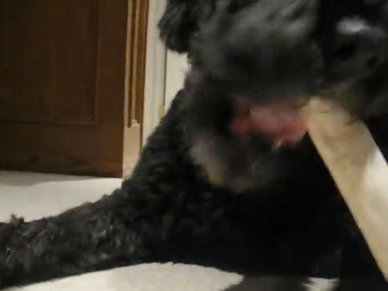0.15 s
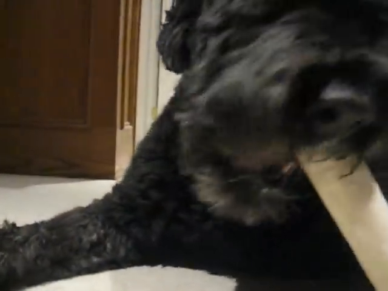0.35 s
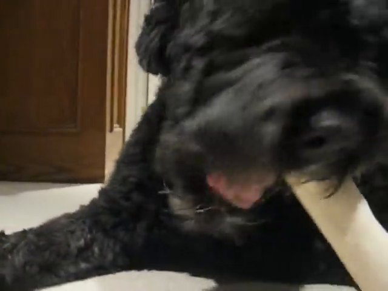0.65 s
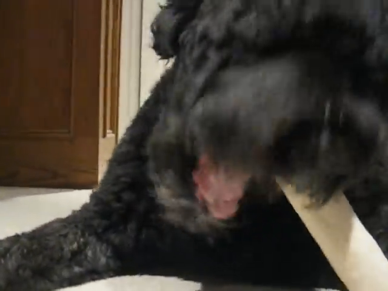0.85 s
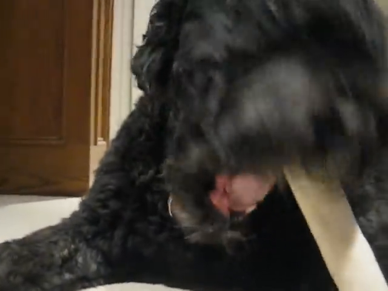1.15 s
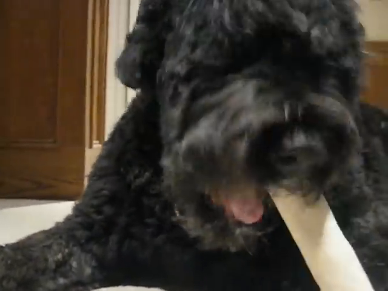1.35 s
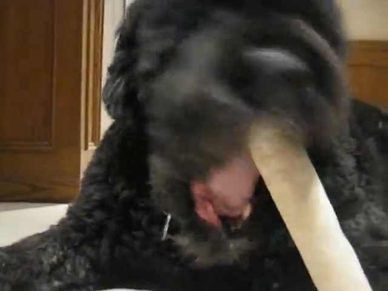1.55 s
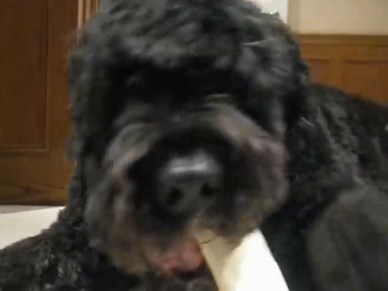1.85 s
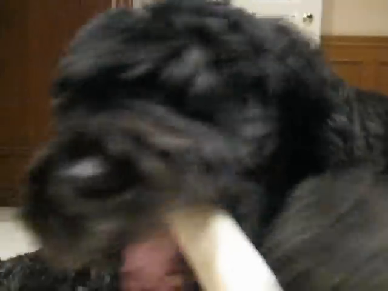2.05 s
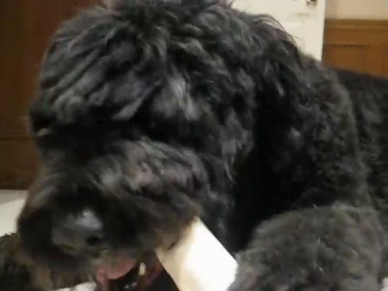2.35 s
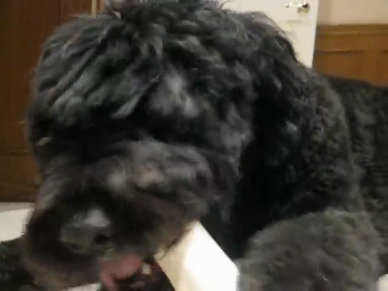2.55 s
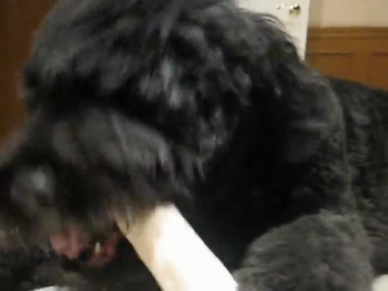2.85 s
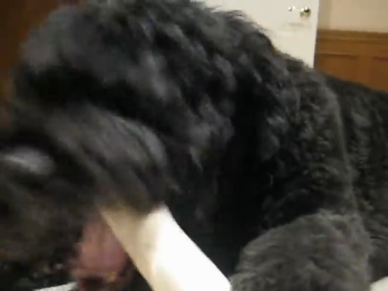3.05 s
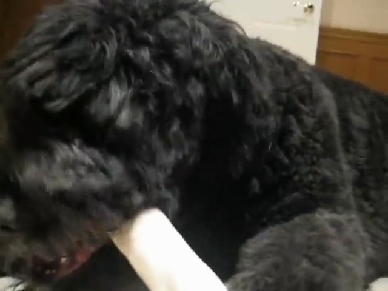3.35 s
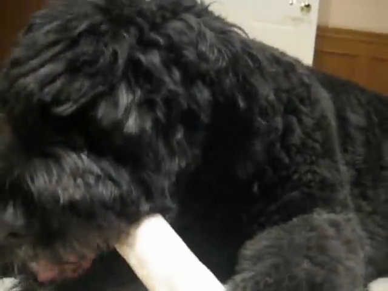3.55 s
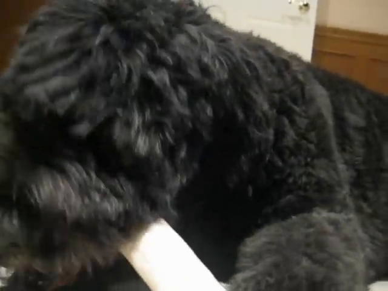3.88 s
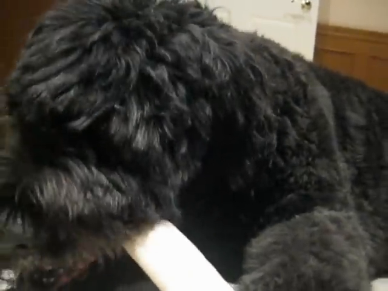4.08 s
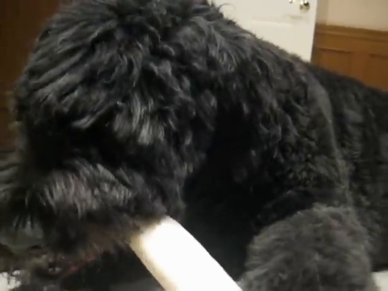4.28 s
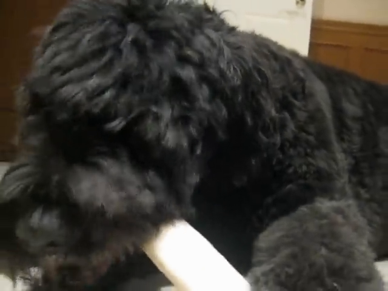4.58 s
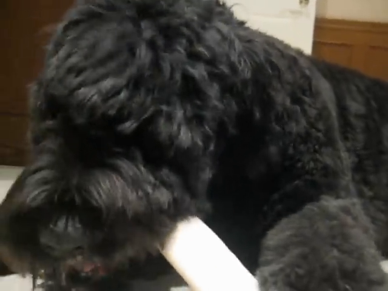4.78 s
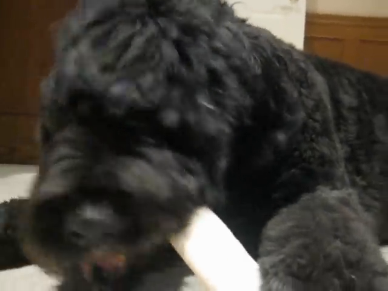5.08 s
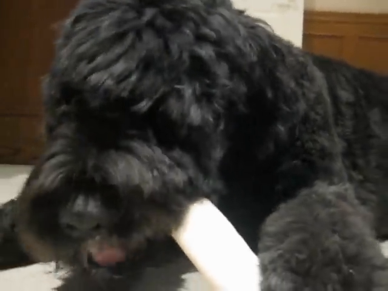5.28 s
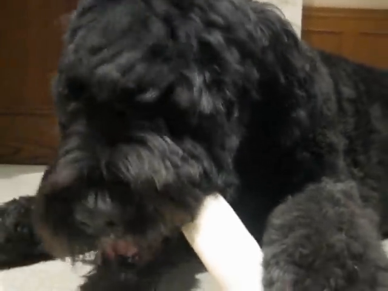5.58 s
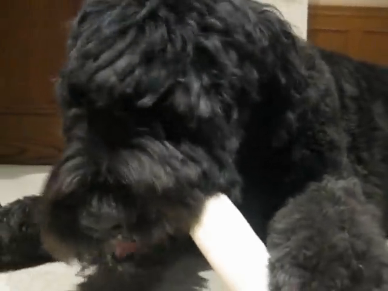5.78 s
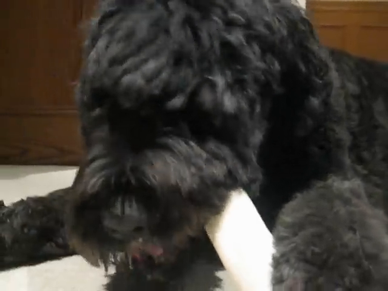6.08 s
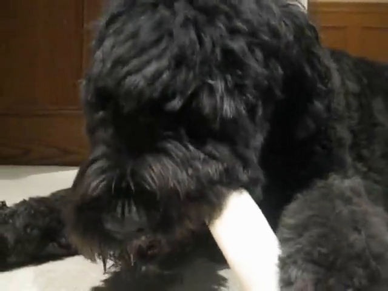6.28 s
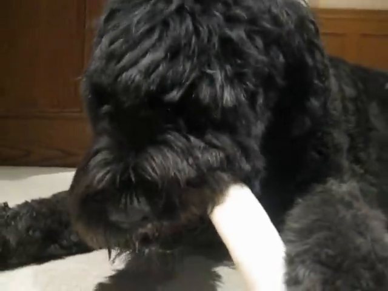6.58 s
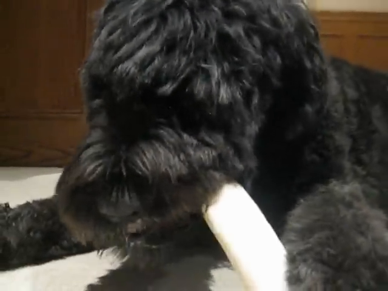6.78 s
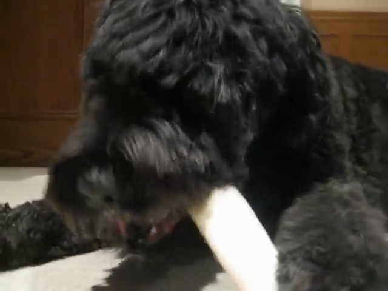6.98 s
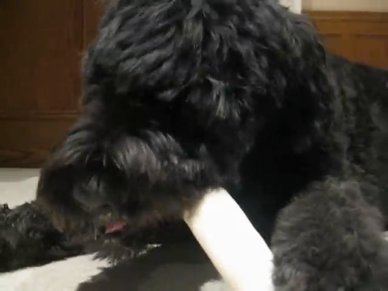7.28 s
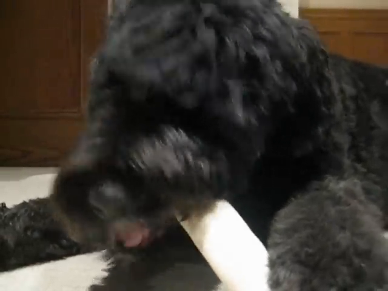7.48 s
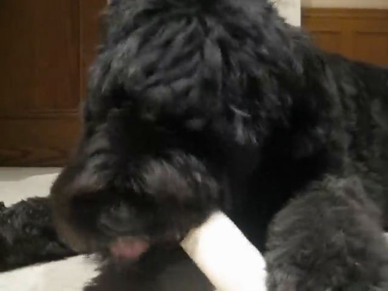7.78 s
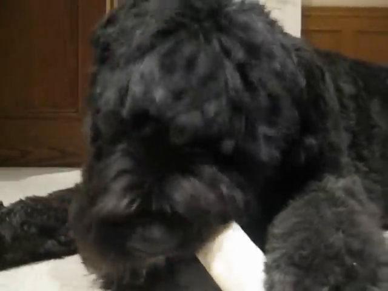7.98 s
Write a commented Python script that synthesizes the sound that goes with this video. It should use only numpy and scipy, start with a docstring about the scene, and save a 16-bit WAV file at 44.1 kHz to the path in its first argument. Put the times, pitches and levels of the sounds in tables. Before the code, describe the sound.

Teeth rub and scrape along a bone as a dog chews right beside the microphone indoors. An early sharp snap is followed by a run of loud crunches, then uneven knocking bites with small wet clicks of tongue and saliva. Underneath are soft thumps of the bone, a low rustle of the dog on carpet, and a faint appliance hum with hiss.

```python
"""A bone scrapes wetly along teeth and fur as a big dog gnaws it, close by in a carpeted room.
Friction makes the rubbing and the crunches, and parting films of saliva tick and smack. Each bite is
an impact that rings tooth, mouth and jaw; once a sliding tooth squeaks. The dog's weight rumbles on
the carpet and the bone bumps dully, over a faint appliance hum and hiss. One narrow-band microphone
hears it all, and the hardest snaps overload it, so that the level dips briefly."""
import sys
import numpy as np
from scipy import signal
from scipy.fft import rfft, irfft, next_fast_len
from scipy.io import wavfile
from scipy.ndimage import uniform_filter1d, map_coordinates

SR = 44100
rng = np.random.default_rng(int(sys.argv[2]) if len(sys.argv) > 2 else 0)


def store_pcm(level_fs):
    """Save levels as 16-bit WAV."""
    pcm = np.round(np.clip(level_fs, -1, 1) * 32767).astype(np.int16)
    wavfile.write(sys.argv[1], SR, np.atleast_2d(pcm).T)


N = 358974
TIME_S = np.arange(N) / SR
CLICK_S = np.arange(2048) / SR  # time within one click
CLICK_MIDDLE_S = CLICK_S[-1] / 2
REST_RUB_DB, REST_SIZZLE_DB = -54.5, -49  # the mouth never quite stops moving
# spectrum of a tiny crack: frequency_hz, gain_db
CRACK_SPECTRUM = [(100, -5), (700, -4.5), (1500, -0.5), (3300, -8), (4800, -4.5), (5800, -18.5),
                  (7000, -27.5)]
# spectrum of a soft, heavy contact: frequency_hz, gain_db
THUMP_SPECTRUM = [(15, -31), (30, -2), (70, -3), (260, -3), (340, -8), (480, -13), (780, -14), (1300, -42)]


def amp(db):
    """Decibels as an amplitude ratio."""
    return 10 ** (np.asarray(db) / 20)


def unit(x):
    """Power normalisation: scaled to rms 1."""
    return x / np.sqrt(np.mean(x ** 2) + 1e-20)


def burst(x):
    """Energy normalisation: scaled to the energy of 5 ms at rms 1."""
    return x * np.sqrt(.005 * SR / (np.sum(x ** 2) + 1e-20))


def wobble(rate_hz):
    """Random modulation: a smooth curve through rate_hz random knots a second."""
    knots = rng.standard_normal(int(N * rate_hz / SR) + 4)
    return map_coordinates(knots, [TIME_S * rate_hz])


def coloured(x, spectrum):
    """Zero-phase filtering by (frequency_hz, gain_db) points joined on a log frequency axis."""
    size = next_fast_len(len(x) + 8192)
    hz, db = np.transpose(spectrum)
    log_hz = np.log(np.fft.rfftfreq(size, 1 / SR) + 1)
    gain = amp(np.interp(log_hz, np.log(hz), db))
    return irfft(rfft(x, size) * gain, size)[:len(x)]


def noise(samples, spectrum):
    """White noise filtered to a spectrum."""
    return coloured(rng.standard_normal(samples), spectrum)


def add(track, start_s, sound):
    """Superposition: sums a sound into the track."""
    part = track[max(round(start_s * SR), 0):][:len(sound)]
    part += sound[:len(part)]


def ring(hz, cycles):
    """A heavily damped resonance whose envelope peaks after the given number of cycles."""
    age = CLICK_S * hz / cycles
    return age * np.exp(-age) * np.sin(2 * np.pi * hz * CLICK_S)


def crackle(rate_hz, scatter_db, share):
    """Friction as shot noise: random slips carry a share of the power, even hiss the rest."""
    slips = (rng.random(N) < rate_hz / SR) * rng.choice([-1, 1], N)
    sizes = amp(scatter_db * np.minimum(rng.standard_normal(N), 2))
    return np.sqrt(share) * unit(slips * sizes) + np.sqrt(1 - share) * rng.standard_normal(N)


def strokes():
    """Amplitude envelopes of dry rub and wet sizzle: each stroke takes hold, stays and lets go."""
    # teeth and tongue along the bone: start_s, length_s, rub_db, sizzle_db
    slides = [(0, 0.22, -35.5, -31), (0.138, 0.16, -33.5, -37), (0.32, 0.21, -48.5, -43),
              (0.64, 0.047, -36, -37), (0.713, 0.18, -41.5, -38.5), (1.117, 0.025, -52, -42),
              (1.277, 0.01, -38, -39), (1.331, 0.056, -36, -44), (1.574, 0.078, -42, -40.5),
              (1.657, 0.04, -30.5, -34), (1.818, 0.056, -37.5, -38), (2.005, 0.18, -40, -35.5),
              (2.216, 0.17, -44, -33.5), (2.436, 0.12, -46, -32), (2.49, 0.15, -75, -36),
              (2.836, 0.053, -47.5, -41.5), (3.08, 0.081, -47.5, -43), (3.195, 0.15, -48, -45),
              (3.454, 0.019, -42.5, -36.5), (3.789, 0.023, -45, -42), (3.888, 0.1, -60, -44),
              (4.206, 0.025, -39.5, -42.5), (4.346, 0.0047, -39, -35), (4.411, 0.013, -46, -37),
              (4.792, 0.02, -40, -43), (5.066, 0.13, -43, -42.5), (5.15, 0.057, -37.5, -49),
              (5.414, 0.1, -45, -46), (5.599, 0.0091, -33, -34), (5.707, 0.052, -40.5, -40.5),
              (5.89, 0.14, -42.5, -41), (6.09, 0.065, -38.5, -37.5), (6.214, 0.084, -42, -37),
              (6.578, 0.1, -50, -45.5), (6.711, 0.065, -46.5, -35), (7.539, 0.06, -45.5, -44.5),
              (8.034, 0.066, -41, -43)]
    attack_s, release_s = 0.015, 0.025
    gains = np.zeros((2, N))
    for start_s, length_s, rub_db, sizzle_db in slides:
        span_s = [start_s - 10 * attack_s, start_s + length_s + 10 * release_s]
        near = slice(*np.searchsorted(TIME_S, span_s))
        since_s = TIME_S[near] - start_s
        rise = np.exp(-(np.minimum(since_s, 0) / attack_s) ** 2)
        fall = np.exp(-np.maximum(since_s - length_s, 0) / release_s)
        # a new stroke takes over from the one that is fading
        gains[:, near] = np.maximum(gains[:, near], rise * fall * amp([[rub_db], [sizzle_db]]))
    return gains


def drifting(x, depth_db):
    """Time-varying filtering: broad resonances come and go as lips and tongue change shape."""
    frames = signal.stft(x, nperseg=512)[2]
    patches = uniform_filter1d(rng.standard_normal(frames.shape), size=5, axis=0)
    patches = uniform_filter1d(patches, size=6, axis=1)
    return unit(signal.istft(frames * amp(depth_db * unit(patches)), nperseg=512)[1][:N])


def scraping(rub_gain, sizzle_gain):
    """Sliding friction: the bone rubs in uneven catches; saliva adds a finer sizzle and ticks."""
    # dry and wet friction spectra: frequency_hz, gain_db
    rub_spectrum = [(250, -11.5), (500, -5), (800, -5), (1800, -2.5), (2500, -13), (3500, -25.5)]
    sizzle_spectrum = [(1400, -28), (2300, -11.5), (3200, -6), (3900, -6.5), (4800, -7.5), (5600, -17.5),
                       (6400, -22), (7200, -33.5)]
    restless = amp(0.39 * wobble(6.7))
    rub_gain = np.hypot(rub_gain, amp(REST_RUB_DB) * restless)
    sizzle_gain = np.hypot(sizzle_gain, amp(REST_SIZZLE_DB) * restless)
    catch = wobble(70)
    rub = coloured(crackle(rate_hz=650, scatter_db=5.5, share=0.43), rub_spectrum)
    rub = drifting(rub, depth_db=1.5) * amp(2.1 * catch)
    sizzle = coloured(crackle(rate_hz=360, scatter_db=8.0, share=0.47), sizzle_spectrum)
    sizzle = drifting(sizzle, depth_db=2.5)
    sparse_slips = crackle(rate_hz=19, scatter_db=4.5, share=0.84)
    crack = burst(noise(len(CLICK_S), CRACK_SPECTRUM) * amp(-60 * CLICK_S / 0.0011))
    ticks = amp(-13.5) * unit(signal.fftconvolve(sparse_slips, crack)[:N])
    flicker = amp(0.94 * catch + 0.65 * wobble(170))
    return rub_gain * rub + sizzle_gain * (flicker * sizzle + ticks)


def saliva(sizzle_gain):
    """Film rupture: single films of saliva burst at random, louder during wet strokes."""
    ticks_per_s, tick_db, scatter_db = 20, -43.5, 1.5
    wet_db, growth = -50.5, 0.62  # ticks gain this many dB per dB of sizzle above wet_db
    out, count = np.zeros(N), int(ticks_per_s * N / SR)
    moments = (rng.random(600)[:count] * N).astype(int)
    for at, (size, pitch) in zip(moments, rng.standard_normal((600, 2))):
        wetness = max(sizzle_gain[at] / amp(wet_db), 1) ** growth
        tick = burst(ring(3400 * np.exp(.3 * pitch), cycles=0.18))
        add(out, at / SR, wetness * amp(tick_db + scatter_db * min(size, 1.5)) * tick)
    return coloured(out, [(4600, -3.5), (5600, -1.5), (7000, -18.5)])


def body_rumble(rub_gain):
    """Low friction noise: the dog's weight shifts on the carpet, more when it pulls at the bone."""
    drag = np.hypot(1, rub_gain / amp(REST_RUB_DB)) ** 0.35
    return amp(-47.5 + 2.1 * wobble(22)) * drag * unit(noise(N, THUMP_SPECTRUM))


def appliance_hum(pitch_hz=249.5):
    """An appliance in the house gives a faint tone that wavers by phase modulation."""
    return amp(-53) * np.sin(2 * np.pi * pitch_hz * TIME_S + 1.1 * wobble(22))


def hiss():
    """The noise floor: stationary hiss of the room and microphone."""
    # background spectrum: frequency_hz, gain_db
    hiss_spectrum = [(240, -25), (500, 1), (1500, -2), (4800, -7.5), (6000, -18), (7000, -24)]
    return amp(-49.5) * unit(noise(N, hiss_spectrum))


def crunches():
    """Brittle fracture: a skidding tooth makes a run of tiny breaks that ring tooth or mouth."""
    # skids over the bone: start_s, length_s, pitch_hz, level_db
    skids = [(0.156, 0.096, 1720, -31.5), (1.68, 0.051, 2130, -32), (1.826, 0.075, 2050, -31.5),
             (2.112, 0.013, 3130, -23.5), (2.145, 0.024, 3460, -16.5), (5.644, 0.0083, 895, -28),
             (6.402, 0.042, 913, -42), (7.212, 0.0062, 1480, -25.5), (7.971, 0.023, 830, -33.5),
             (8.025, 0.012, 1380, -27.5)]
    out, slips = np.zeros(N), crackle(rate_hz=900, scatter_db=8.0, share=0.78)
    for start_s, length_s, pitch_hz, level_db in skids:
        force = slips[round(start_s * SR):][:round(length_s * SR)]
        force = force * np.sqrt(np.hanning(len(force)))
        skid = signal.fftconvolve(force, ring(pitch_hz, cycles=0.38))
        add(out, start_s, amp(level_db) * skid * np.sqrt(len(force) / np.sum(skid ** 2)))
    return out


def contact(spread_s, slip_gain, count=8):
    """Contact force as an impulse train: one hard touch, then slips spread_s later on average."""
    force = np.zeros(len(CLICK_S))
    force[0] = 1
    delays_s = rng.gamma(2, spread_s / 2, count)
    sizes = rng.choice([-1, 1], count) * np.exp(-delays_s / spread_s / 2)
    np.add.at(force, np.minimum((delays_s * SR).astype(int), len(force) - 1), slip_gain * sizes)
    return force


def struck(force, response):
    """Forced vibration: the force convolved with a body's impulse response, at a set energy."""
    return burst(signal.fftconvolve(force, response)[:len(CLICK_S)])


def grind(fade_s):
    """Friction noise of a short skid, swelling to CLICK_MIDDLE_S and fading again."""
    swell = np.exp(-np.abs(CLICK_S - CLICK_MIDDLE_S) / fade_s)
    return burst(noise(len(CLICK_S), CRACK_SPECTRUM) * swell)


def room(x, t60_s):
    """Reverberation: absorption by the carpet leaves a weak, dull, exponentially decaying tail."""
    t = np.arange(SR // 4) / SR
    tail = noise(len(t), [(150, -3.5), (400, 3.0), (1500, -7.5), (3500, -2.0), (7000, -17.5)])
    tail = tail * amp(-60 * t / t60_s) * (1 - np.exp(-t / 0.0032))
    return signal.fftconvolve(x, tail / np.linalg.norm(tail)) / 2


def bites():
    """Impacts excite damped resonances: the tooth's snap, the mouth's knock and the jaw's thud."""
    # teeth meeting the bone: start_s, jaw_hz, jaw_db, mouth_hz, mouth_db, snap_hz, snap_db
    impacts = [(0.36, 249, -27, 1750, -34, 4100, -53), (0.5408, 730, -37, 1110, -16, 3460, -11),
               (0.6139, 250, -53, 1990, -23, 3170, -23), (1.3681, 487, -27, 1470, -25.5, 2370, -32),
               (1.6273, 303, -15.5, 1500, -16.5, 2940, -58), (1.685, 337, -32.5, 1650, -24, 3570, -22.5),
               (1.7799, 242, -15, 1700, -30.5, 3100, -27), (2.068, 334, -31.5, 955, -25.5, 3700, -40),
               (2.142, 615, -29, 1900, -18.5, 3620, -11), (2.1556, 780, -30, 1920, -24, 3880, -15),
               (2.2169, 520, -40, 1870, -28, 3900, -21), (2.301, 160, -39, 2200, -17, 3330, -7.5),
               (2.312, 656, -30, 2080, -23, 3980, -15), (2.4748, 680, -17, 1200, -15, 3680, -2),
               (2.5106, 360, -28, 1840, -20, 3350, -6), (2.835, 860, -32.5, 2130, -21.5, 2460, -27),
               (3.1281, 796, -31.5, 1290, -23.5, 3710, -25.5),
               (3.2487, 334, -26.5, 1140, -26.5, 3000, -21.5), (3.313, 260, -21, 1010, -25, 3500, -28),
               (3.6, 660, -59, 1600, -21.5, 3310, -20.5), (3.8587, 920, -36, 1370, -18, 3300, -19),
               (4.165, 604, -21, 1420, -15.5, 3340, -14), (4.399, 563, -23, 970, -32.5, 3400, -30.5),
               (4.7135, 146, -24.5, 1410, -30.5, 3430, -33.5), (4.7791, 402, -32, 1230, -23.5, 2900, -35.5),
               (4.84, 620, -21.5, 1280, -31.5, 3330, -30.5), (5.6445, 336, -18.5, 1220, -22.5, 3570, -26),
               (5.6675, 287, -18, 1280, -14.5, 3200, -37), (5.7345, 260, -21.5, 1370, -19.5, 3440, -28.5),
               (5.7493, 574, -19, 1420, -19.5, 3670, -28.5), (5.7553, 173, -22, 1310, -28, 3600, -37),
               (6.0425, 777, -38, 1380, -21, 3370, -21.5), (7.12, 734, -36, 1710, -27, 3300, -26.5),
               (7.2188, 725, -18, 1610, -21, 3420, -23), (7.2254, 194, -22, 870, -40, 2750, -41),
               (7.265, 181, -22, 1070, -35.5, 3900, -46), (7.6661, 716, -19, 1460, -24.5, 3800, -32.5),
               (8.0328, 149, -30.5, 1850, -25, 3700, -33.5)]
    out = np.zeros(N)
    for start_s, jaw_hz, jaw_db, mouth_hz, mouth_db, snap_hz, snap_db in impacts:
        # bites cushioned by lips and gums are duller and last longer
        softness = np.clip((jaw_db - snap_db) / 10, 0, 1)
        force = contact(spread_s=0.001 + .0013 * softness, slip_gain=0.87, count=12)
        tooth = ring(snap_hz, cycles=1.0) + amp(0.5) * ring(1.188 * snap_hz, cycles=0.86)
        snap = amp(snap_db) * struck(force, tooth)
        knock = amp(mouth_db) * struck(force, ring(mouth_hz, cycles=0.53))
        jaw = struck(contact(spread_s=0.001304, slip_gain=0.99), ring(jaw_hz, cycles=0.45))
        # in cushioned bites the head's mass adds a low push
        push = softness * amp(-6.5) * burst(ring(232.0, cycles=0.39))
        hollow = amp(jaw_db) * (jaw + push) - knock
        add(out, start_s, snap + hollow)
        # the deep part fills the room; the snap is heard almost only directly
        add(out, start_s, amp(-12.0) * room(hollow, t60_s=0.26) + amp(-18.5) * room(snap, t60_s=0.092))
        skid_db = (mouth_db + snap_db) / 2 - 12 + 9.4 * softness
        add(out, start_s + 0.00124 - CLICK_MIDDLE_S, amp(skid_db) * grind(fade_s=0.0038))
    return out


def bone_bumps():
    """Soft impacts: a long contact gives low frequencies, swelling and fading in uneven cycles."""
    # the bone's free end on floor and paws: peak_s, pitch_hz, level_db, half_width_s
    landings = [(0.636, 217.8, -25, 0.0086), (0.799, 110.7, -24.5, 0.021), (0.971, 153.7, -33, 0.025),
                (1.874, 82, -28, 0.0059), (2.044, 129.7, -21.5, 0.014), (3.037, 140, -30, 0.0038),
                (3.101, 128.4, -33, 0.013), (5.081, 150, -31, 0.0059), (5.197, 169.7, -31.5, 0.033),
                (6.028, 150, -30.5, 0.007), (6.118, 139, -33, 0.021), (7.243, 87, -33.5, 0.029),
                (7.978, 210.5, -23, .006)]
    out, thump = np.zeros(N), unit(noise(N, THUMP_SPECTRUM))
    for peak_s, pitch_hz, level_db, half_width_s in landings:
        phase = 2 * np.pi * np.cumsum(pitch_hz * np.exp(0.35 * wobble(220))) / SR
        swell = np.exp(-((TIME_S - peak_s) / half_width_s) ** 2 / 2)
        out += amp(level_db) * (np.sin(phase) + 0.44 * thump) * swell
    return out


def smacks():
    """Impulse excitation: films of saliva part on tongue and lips with a small bright click."""
    # wet clicks: start_s, pitch_hz, level_db
    partings = [(.701, 3750, -27.5), (0.745, 4500, -30.5), (0.7835, 4960, -29.5), (0.832, 4530, -32.5),
                (.866, 2900, -33), (1.2825, 2440, -34.5), (1.5253, 4940, -32.5), (1.8657, 3100, -27),
                (1.983, 3020, -35), (2.2, 4390, -35), (2.435, 3680, -25), (2.785, 3140, -30),
                (2.846, 4170, -26.5), (3.0471, 4060, -34), (3.197, 800, -26.5), (3.3073, 3630, -24.5),
                (4.431, 4830, -31.5), (4.6897, 4700, -36.5), (5.036, 1860, -33.5), (5.185, 3000, -29.5),
                (5.239, 1830, -32.5), (5.606, 4200, -35), (5.8478, 4000, -36.5), (6.098, 3050, -34),
                (6.246, 3080, -26.5), (6.2718, 3500, -31), (6.327, 4000, -31.5), (6.4769, 3400, -27.5),
                (6.584, 4080, -33), (6.792, 4600, -33.5), (6.943, 1570, -38.5), (6.9763, 4020, -38.5),
                (7.052, 3700, -35), (7.0834, 4430, -40.5), (7.114, 1950, -33), (7.4358, 4200, -44),
                (7.4808, 3330, -37), (7.505, 2900, -34.5), (7.5411, 2590, -35.5)]
    out = np.zeros(N)
    for start_s, pitch_hz, level_db in partings:
        # small films part in one crisp tick, large ones tear in several steps
        tear = np.clip((level_db + 41.5) / 10, 0, 1)
        click = struck(contact(spread_s=0.0025, slip_gain=0.5 * tear), ring(pitch_hz, cycles=0.44))
        add(out, start_s, amp(level_db) * click)
        add(out, start_s + 0.000896 - CLICK_MIDDLE_S, tear * amp(level_db - 3.5) * grind(fade_s=0.0023))
    return out


def squeak():
    """Stick-slip oscillation: a tooth sliding along the bone gives a thin, rough tone."""
    # course of the tone: time_s, pitch_hz, level_db
    glide = [(3.48, 2220, -60), (3.495, 2190, -41), (3.6, 2180, -51)]
    time_s, pitch_hz, level_db = np.transpose(glide)
    rough_hz = np.interp(TIME_S, time_s, pitch_hz) * (1 + 0.026 * wobble(300))
    sounding = (TIME_S > time_s[0]) & (TIME_S < time_s[-1])
    envelope = sounding * amp(np.interp(TIME_S, time_s, level_db))
    return envelope * np.sin(2 * np.pi * np.cumsum(rough_hz) / SR)


def gain_control(x):
    """Compression: after an overload the level, the bass most of all, drops and creeps back."""
    threshold_db, duck_db, attack_s, recover_s = -8, 8.5, 0.0083, 0.097
    t = np.arange(SR) / SR
    excess = np.maximum(np.abs(x) - amp(threshold_db), 0)
    memory = np.exp(-t / recover_s) * (1 - np.exp(-t / attack_s))
    depth = np.tanh(signal.fftconvolve(excess, memory)[:N] / 25)
    bass = coloured(x, [(350, 3.5), (1000, -20)])
    thinned = x - bass + bass * amp(-4.5 * depth ** 2)
    return thinned * amp(-duck_db * depth)


def scene():
    """Superposition: all sources sum at one point, the same in both channels."""
    rub_gain, sizzle_gain = strokes()
    mouth = bites() + crunches() + smacks()
    mouth += scraping(rub_gain, sizzle_gain) + saliva(sizzle_gain) + squeak()
    mono = mouth + body_rumble(rub_gain) + bone_bumps() + appliance_hum() + hiss()
    return np.array([mono, mono])


def record(dry):
    """Band limiting and clipping: the hardest snaps overload the microphone and shift its baseline."""
    # the microphone's treble response: frequency_hz, gain_db
    treble_response = [(4800, 0.5), (5700, 0.5), (6300, -4), (6800, -9.5), (7300, -39), (8000, -90.5)]
    ceiling, settle_s = 0.86, 0.044
    heard = gain_control(coloured(dry[0], treble_response))
    clipped = np.clip(heard, -ceiling, ceiling)
    last_clip_s = np.maximum.accumulate(np.where(heard != clipped, TIME_S, -1))
    shifted = clipped - .022 * np.exp(-(TIME_S - last_clip_s) / settle_s)
    out = coloured(shifted, [(6200, 0), (8000, -12), (14500, -11), (16000, -13), (16600, -120)])
    return np.array([out, out])


dry = scene()
out = record(dry)
store_pcm(out)
```